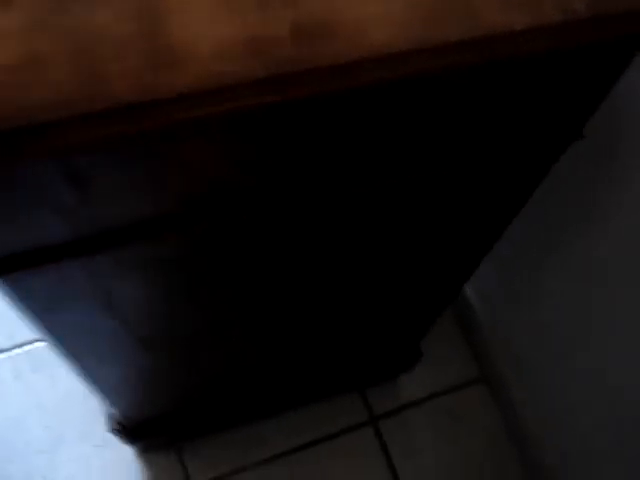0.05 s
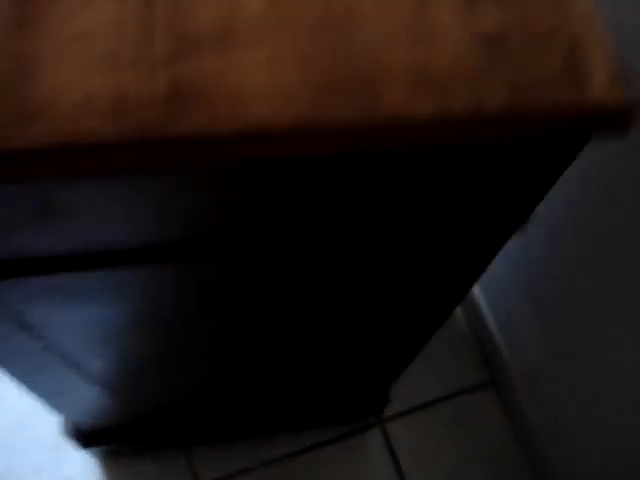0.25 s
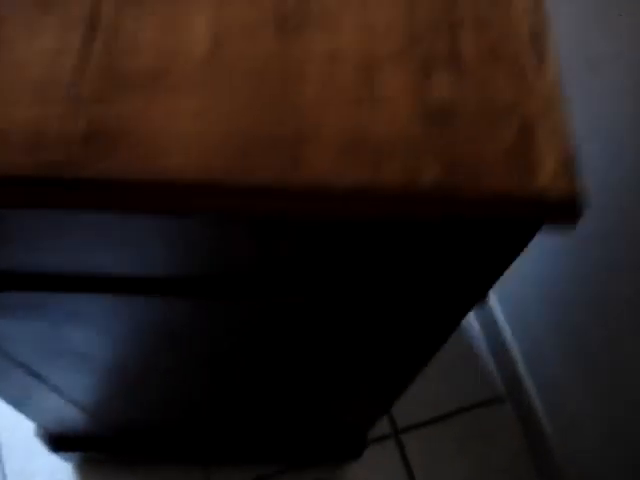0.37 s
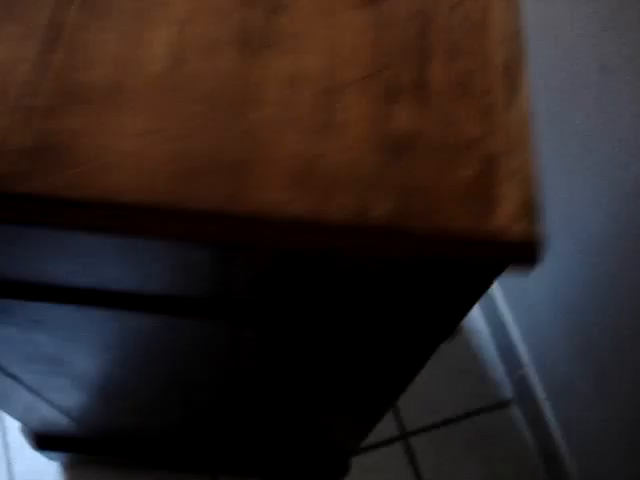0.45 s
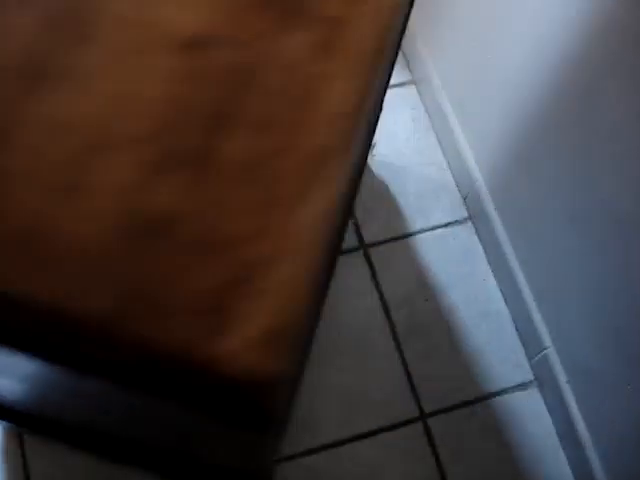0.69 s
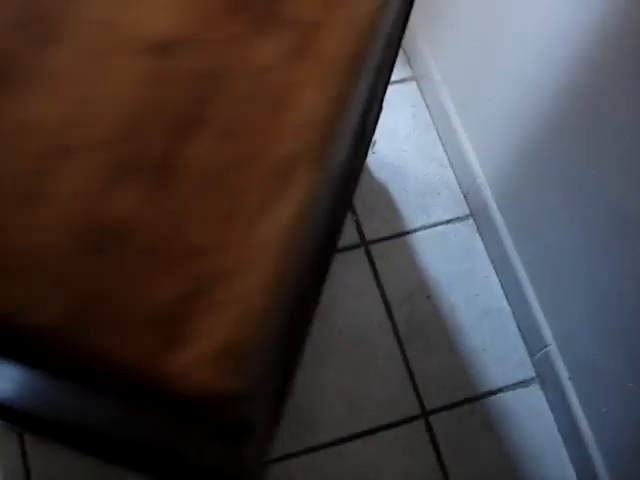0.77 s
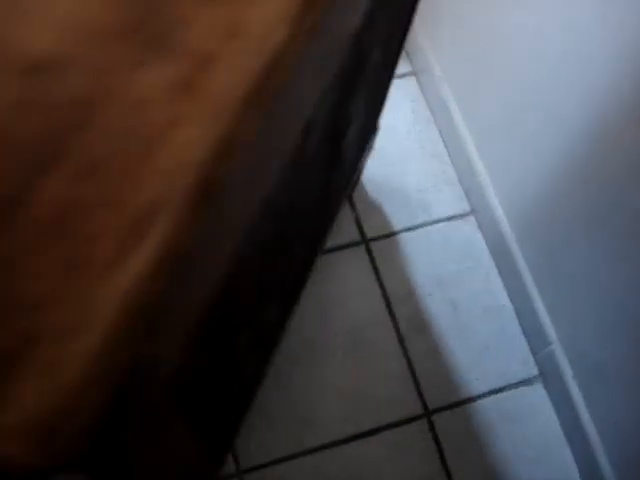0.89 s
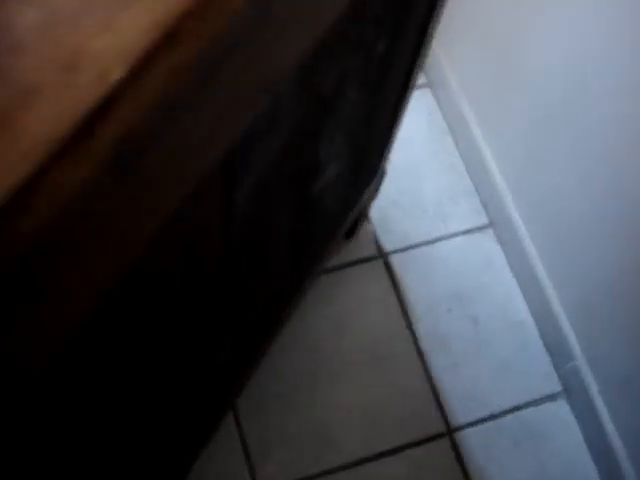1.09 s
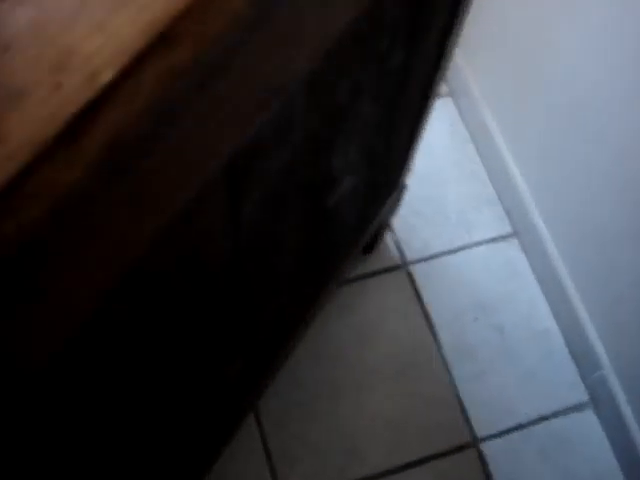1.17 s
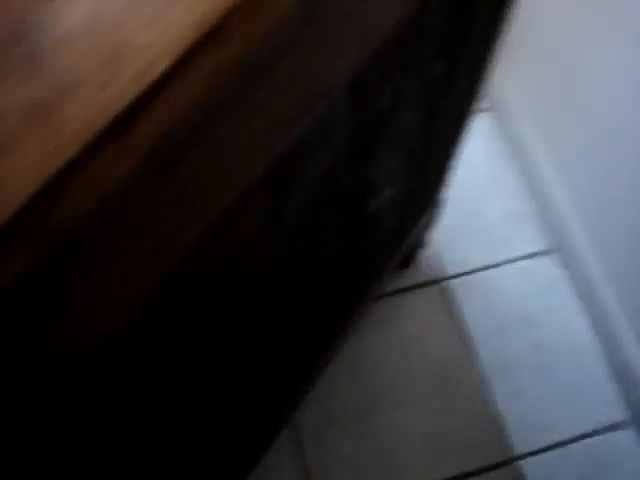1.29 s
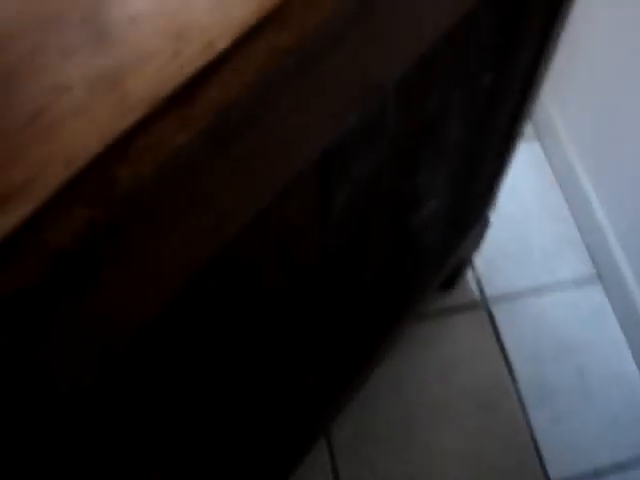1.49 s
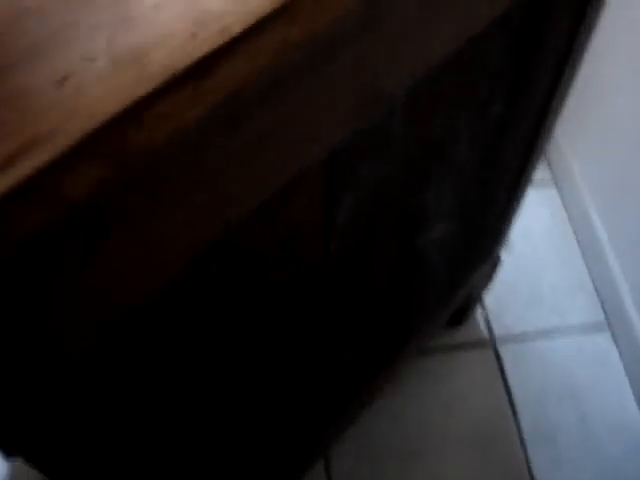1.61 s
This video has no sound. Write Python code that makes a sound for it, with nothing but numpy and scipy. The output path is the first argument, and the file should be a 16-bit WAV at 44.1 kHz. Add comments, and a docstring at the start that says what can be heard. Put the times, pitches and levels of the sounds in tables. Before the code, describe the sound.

A heavy wooden cabinet scrapes and judders across a tiled floor with a loud knock.

```python
"""A small hard room with a tiled floor: a heavy wooden cabinet is shoved along, close by.
Its feet stick and slip, shaking the panels, grinding grit and rasping now and then.
It jolts with a loud knock, bumps a few more times and slides to rest; a loose fitting ticks twice.
The loudest blows overload the microphone."""
import sys
import numpy as np
from scipy import signal
from scipy.fft import rfft, irfft
from scipy.io import wavfile
from scipy.ndimage import uniform_filter1d

SR = 44100
rng = np.random.default_rng(int(sys.argv[2]) if len(sys.argv) > 2 else 0)


def digitize_waveform(pressure):
    """Quantize a signal to 16-bit integers and store it at the path in sys.argv[1].

    Rows of a 2-D input are taken as channels; values are limited to [-1, 1].
    """
    field = np.atleast_2d(pressure).T
    bounded = np.clip(field, -1, 1)
    quanta = np.round(bounded * 32767).astype(np.int16)
    wavfile.write(sys.argv[1], SR, quanta)


N = 72765
T = np.arange(N) / SR

# Sliding feet: time_s, judder_db, grit_db
FEET_LEVELS = [(0, -13, -28.5), (0.039, -24, -38.5), (0.109, -30.5, -35), (.17, -26.5, -32),
               (.238, -19.5, -32), (.28, -18.5, -35.5), (.36, -13.5, -27), (.45, -17, -33), (.54, -14, -28),
               (.6, -17.5, -28.5), (.7, -17.5, -30.5), (0.749, -26, -25), (.78, -20.5, -29.5),
               (.87, -11, -28.5), (.96, -23.5, -28), (1.03, -24, -31), (1.11, -23.5, -28),
               (1.22, -20.5, -31), (1.29, -27.5, -33.5), (1.35, -32, -42.5), (1.39, -31.5, -45.5),
               (1.48, -49, -50.5), (1.65, -56, -56)]
# What the slide excites: time_s, bass_db, drone_db, hiss_db
EXCITED_LEVELS = [(0, -37, -59, -40.5), (.12, -43, -39, -72), (.26, -34, -46, -69),
                  (.42, -18.5, -27.5, -47), (.53, -21.5, -21.5, -57), (.62, -21.5, -24.5, -41.5),
                  (0.731, -17.5, -16.5, -55), (.81, -25, -28, -45), (.96, -29, -17.5, -49.5),
                  (1.02, -24.5, -23, -42), (1.12, -25.5, -20.5, -41.5), (1.22, -37, -21.5, -45.5),
                  (1.299, -35.5, -39, -62), (1.36, -40.5, -47, -51.5), (1.5, -51, -49, -68),
                  (1.65, -59.5, -60, -55)]
# Slide spectra: freq_hz, gain_db
JUDDER_SPECTRUM = [(30, -22), (70, -24.5), (110, -13.5), (170, 2), (240, 0.5), (340, 3), (410, -0.5),
                   (500, -1.5), (700, -6), (1100, -10.5), (1600, -18.5), (3000, -27.5), (10000, -71)]
BASS_SPECTRUM = [(30, -45), (74, -34.5), (92, 0.5), (108, -4.5), (128, 6), (150, -13.5), (205, 2),
                 (260, -14), (500, -51.5), (10000, -83.5)]
GRIT_SPECTRUM = [(100, -36.5), (500, 1.5), (1000, 1), (1400, 0), (1800, 0.5), (2500, 0.5), (3100, -8),
                 (3800, -5), (4500, -13.5), (6500, -18.5), (8500, -27.5), (10000, -32)]
HISS_SPECTRUM = [(300, -50), (2500, -31), (3700, 12), (4500, 4), (5600, 13), (7300, 3.5), (8500, 1),
                 (10000, -4)]
# Cabinet modes and droning panel modes: pitch_hz, level_db, t60_s
CABINET_MODES = [(112, -3.5, .3), (220, -14, 0.16), (241.6, 0.5, 0.22), (332.6, -11, 0.74),
                 (382.5, 4.5, 0.068), (398, -11.5, 0.11), (578, 0.5, 0.1), (626, -0.5, 0.47),
                 (743.6, -30, 0.21), (845, -27.5, 0.9), (1062, 5.5, 0.58), (1744, 4, 0.19),
                 (1950, 11.5, 0.9)]
DRONE_MODES = [(237, -3.5, 0.16), (322.8, -2, .3)]
# A foot catching: centre_s, sigma_s, pitch_hz, width_hz, level_db
FOOT_RASPS = [(0.216, 0.058, 465, 111, -25), (0.612, 0.02, 2450, 400, -27.5),
              (0.807, 0.011, 380, 119, -13.5), (1.424, .02, 1170, 300, -40), (1.64, 0.006, 516, 201, -32.5)]
# Blows on the cabinet: start_s, panel_db, crack_db, thud_db, heave_db, contact_s
BLOWS = [(0.2911, -10.5, -3.5, -10.5, -4, 0.00086), (.298, 0, 5, -2.5, 9, 0.0017),
         (.311, 3, -8, -29, 2.5, 0.0028), (0.3269, 1, -5.5, -20, -7, 0.00048),
         (.343, -5.5, -18, -28, -4, 0.00024), (.352, -3.5, -19, -8.5, -3, 0.00054),
         (0.4009, -10, -5, -9, -19, 0.00058), (0.4716, -9.5, -2, -27, -9, .0002),
         (.480, -12, -21.5, -21, -19, 0.00013), (0.7978, -6.5, -3.5, -23, -7, 0.0011),
         (.809, -9, -14.5, -26, -21, .0009), (0.8597, -8, -3.5, -34, -10, 0.0018),
         (.878, -1.5, -30, -7, -13, 0.0024), (.893, -3, -19, -14, -20, 0.0021),
         (0.939, -4.5, -16, -17, -42, 0.0028), (.982, -16, -20, -32, -28, 0.0039),
         (1.634, -36, -49, -60, -61, 0.00042)]
# Blow spectra: freq_hz, gain_db
PANEL_SPECTRUM = [(30, -37), (70, -14), (120, -32.5), (170, -0.5), (235, 3.5), (300, 4.5), (400, -3.5),
                  (700, -1.5), (1300, -8), (2500, -19.5), (5000, -42), (10000, -36)]
CRACK_SPECTRUM = [(100, -16), (500, -15.5), (1000, 6), (2500, 4.5), (4000, -5.5), (6500, -12.5),
                  (10000, -25)]
# Loose fitting's clicks: start_s, level_db
CLICKS = [(1.3012, -3.5), (1.305, -10.5), (1.5161, -11), (1.5217, -19)]
# Click and room noise spectra: freq_hz, gain_db
CLICK_SPECTRUM = [(200, -40), (1500, 4), (3000, 9.5), (4500, 6), (6500, 2.5), (8000, 0), (10000, -6)]
ROOM_NOISE_SPECTRUM = [(25, -10), (60, -10.5), (130, 3), (300, -4.5), (900, -0.5), (1500, -7), (2700, -10),
                       (5000, -26.5), (7800, -21), (10000, -31)]
# Room decay: freq_hz, t60_s
ROOM_DECAY = [(60, 0.85), (200, 0.55), (1000, 0.57), (3000, 0.38), (10000, 0.16)]

JUDDER_DB, BASS_DB, DRONE_DB, GRIT_DB, HISS_DB = -1, -2, -0.5, 2.5, 0.5
PANEL_DB, CRACK_DB, THUD_DB, HEAVE_DB, BOOM_DB = 19.5, 9.5, 21.5, 9, -13


def amp(db):
    """Decibels to gain."""
    return 10 ** (np.asarray(db) / 20)


def unit_rms(x):
    """Scales to rms 1."""
    return x / np.sqrt(np.mean(x ** 2) + 1e-20)


def unit_energy(x):
    """Scales to energy 1."""
    return x / np.linalg.norm(x)


def lookup(table, hz):
    """Interpolates over log frequency."""
    freq_hz, value = np.transpose(table)
    return np.interp(np.log(hz + 1), np.log(freq_hz + 1), value)


def curves(table):
    """Interpolates each level column over time."""
    time_s, *columns = np.transpose(table)
    return [np.interp(T, time_s, column) for column in columns]


def add(mix, start_s, sound):
    """Mixes a sound in at start_s."""
    part = mix[max(round(start_s * SR), 0):][:len(sound)]
    part += sound[:len(part)]


def convolve(x, response):
    """Plays x through a response."""
    return signal.fftconvolve(x, response)[:N]


def colour(x, spectrum, size=4096):
    """Minimum-phase filter of unit energy."""
    log_gain = np.log(amp(lookup(spectrum, abs(np.fft.fftfreq(size, 1 / SR)))))
    response = np.fft.ifft(np.exp(np.conj(signal.hilbert(log_gain)))).real[:size // 2]
    return convolve(x, unit_energy(response))


def decay(t60_s):
    """Falls 60 dB in t60_s."""
    return np.exp(-np.log(1000) * T / t60_s)


def burst(t60_s):
    """Dying noise of unit energy."""
    return unit_energy(rng.standard_normal(N) * decay(t60_s))


def swing(hz, t60_s):
    """A sine of unit energy that builds and dies."""
    return unit_energy(np.sin(2 * np.pi * hz * T) * T * decay(t60_s))


def steady(x, evenness=0.3, size=2600):
    """Friction evens out a rubbed resonance's surges; evenness 0-1."""
    power = uniform_filter1d(unit_rms(x) ** 2, size) + 0.01
    return unit_rms(x / power ** (evenness / 2))


def room(x, wet_db, early_db=7, delay_s=0.002):
    """Adds tile and wall reflections, each band dying at its own rate."""
    near_corner = 1 + amp(early_db) * decay(t60_s=0.03)
    reflections = rng.standard_normal(N) * (T > delay_s) * near_corner
    hz, time_s, bands = signal.stft(reflections, SR, nperseg=256)
    fade = np.exp(-np.log(1000) * time_s / lookup(ROOM_DECAY, hz)[:, None])
    tail = unit_energy(signal.istft(bands * fade, SR, nperseg=256)[1])
    return (x + amp(wet_db) * convolve(x, tail)) / np.hypot(1, amp(wet_db))


def cabinet(force, ring_db=-28.5):
    """The panels pass a force on and ring at their modes."""
    ring = sum(amp(db) * np.cos(2 * np.pi * hz * T) * unit_energy(decay(t60_s))
               for hz, db, t60_s in CABINET_MODES)
    return force + amp(ring_db) * convolve(force, ring)


def stick_slip(rate_hz=85, jitter=0.35, spread_db=3, count=400):
    """The feet stick and let go: one impulse a slip, uneven in time and strength."""
    gap, strength = rng.standard_normal((count, 2)).T
    starts_s = np.cumsum(np.exp(jitter * gap)) / rate_hz
    slips = np.zeros(N)
    for start_s, db in zip(starts_s, spread_db * strength):
        add(slips, start_s, amp([db]))
    return slips


def shudder(slips, judder_db, bass_db, drone_db, rub_gain=0.6, low_cut_hz=76):
    """Slips and rubbing shake the cabinet and make its panels drone."""
    force = unit_rms(slips - slips.mean()) + rub_gain * rng.standard_normal(N)
    bass = steady(colour(force, BASS_SPECTRUM), evenness=1, size=1700)
    drone = unit_rms(sum(amp(db) * steady(convolve(force, swing(hz, t60_s)))
                         for hz, db, t60_s in DRONE_MODES))
    judder = steady(room(colour(cabinet(force), JUDDER_SPECTRUM), wet_db=-2))
    body = judder * amp(judder_db) + bass * amp(bass_db) + drone * amp(drone_db)
    # Cuts the deep rumble below the slide's bass and drone.
    return signal.sosfilt(signal.butter(4, low_cut_hz, "highpass", fs=SR, output="sos"), body)


def scrape(slips, grit_db, hiss_db, grains_per_s=3000, spread_db=2.5, patch_db=2):
    """Grit grinds on the tiles in patches, harder at each slip, with a fine hiss."""
    grains = (rng.random(N) < grains_per_s / SR) * rng.choice([-1, 1], N)
    grains = grains * amp(spread_db * np.minimum(rng.exponential(1, N), 4))
    patches = unit_rms(uniform_filter1d(uniform_filter1d(rng.standard_normal(N), 700), 700))
    surges = 1 + 0.13 * unit_rms(convolve(slips, decay(t60_s=0.0068)))
    grains *= surges * amp(patch_db * patches)
    grit = unit_rms(room(colour(grains, GRIT_SPECTRUM), wet_db=-2))
    hiss = unit_rms(room(colour(grains, HISS_SPECTRUM), wet_db=18))
    return grit * amp(grit_db) + hiss * amp(hiss_db)


def slide():
    """One train of slips drives both shudder and scrape."""
    judder_db, grit_db = curves(FEET_LEVELS)
    bass_db, drone_db, hiss_db = curves(EXCITED_LEVELS)
    slips = stick_slip()
    body = shudder(slips, JUDDER_DB + judder_db, BASS_DB + bass_db, DRONE_DB + drone_db)
    return body + scrape(slips, GRIT_DB + grit_db, HISS_DB + hiss_db)


def rasps():
    """A foot catches and chatters briefly in one resonance."""
    hz, out = np.fft.rfftfreq(N, 1 / SR), np.zeros(N)
    for centre_s, sigma_s, pitch_hz, width_hz, db in FOOT_RASPS:
        resonance = 1 / (1 + (2 * (hz - pitch_hz) / width_hz) ** 2)
        chatter = irfft(rfft(rng.standard_normal(N)) * resonance, N)
        swell = np.exp(-0.5 * ((T - centre_s) / sigma_s) ** 2)
        out += amp(db) * steady(chatter, size=900) * swell
    return out


def knocks():
    """Each blow: a force pulse on the panels, a contact crack, a thud and a whole-body heave."""
    force, cracks, low = np.zeros((3, N))
    for start_s, panel_db, crack_db, thud_db, heave_db, contact_s in BLOWS:
        pulse = np.exp(-2 * np.pi * T / contact_s)
        add(force, start_s, amp(panel_db) * room(pulse / pulse.sum(), wet_db=2))
        add(cracks, start_s, amp(crack_db) * burst(t60_s=0.03))
        add(low, start_s, amp(THUD_DB + thud_db) * swing(hz=116, t60_s=0.066))
        add(low, start_s, amp(HEAVE_DB + heave_db) * swing(hz=41.5, t60_s=0.018))
    panels = colour(cabinet(force), PANEL_SPECTRUM)
    cracks = room(colour(cracks, CRACK_SPECTRUM), wet_db=-2)
    return amp(PANEL_DB) * panels + amp(CRACK_DB) * cracks + low


def boom(start_s=0.35, pitch_hz=156.6):
    """A large panel rings on after the first jolt."""
    out = np.zeros(N)
    envelope = decay(t60_s=0.93) * (1 - decay(t60_s=0.05))
    add(out, start_s, amp(BOOM_DB) * np.sin(2 * np.pi * pitch_hz * T) * envelope)
    return out


def ticks(gain_db=1):
    """A loose fitting gives bright double clicks."""
    clicks = np.zeros(N)
    for start_s, db in CLICKS:
        add(clicks, start_s, amp(db) * burst(t60_s=0.054))
    return amp(gain_db) * room(colour(clicks, CLICK_SPECTRUM), wet_db=-8)


def scene():
    """The cabinet over quiet room noise, mono."""
    room_noise = amp(-41.5) * unit_rms(colour(rng.standard_normal(N), ROOM_NOISE_SPECTRUM))
    return (knocks() + boom() + slide() + rasps() + ticks() + room_noise)[None]


def record(dry):
    """Lopsided microphone overload, bass roll-off, band limit."""
    knee, low_cut_hz, edge_hz = 8, 12, 10150
    limit = np.where(dry > 0, 0.8, 1.03)
    clipped = dry / (1 + abs(dry / limit) ** knee) ** (1 / knee)
    highpass = signal.butter(1, low_cut_hz, "highpass", fs=SR, output="sos")
    lowpass = signal.firwin(511, edge_hz, window=("kaiser", 8), fs=SR)
    return signal.oaconvolve(signal.sosfilt(highpass, clipped), lowpass[None], "same")


dry = scene()
out = record(dry)
digitize_waveform(out)
```